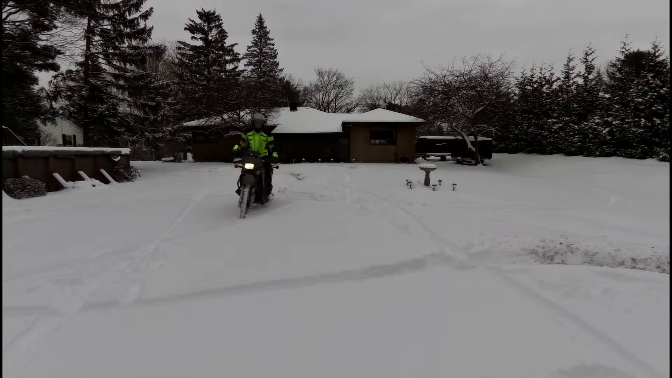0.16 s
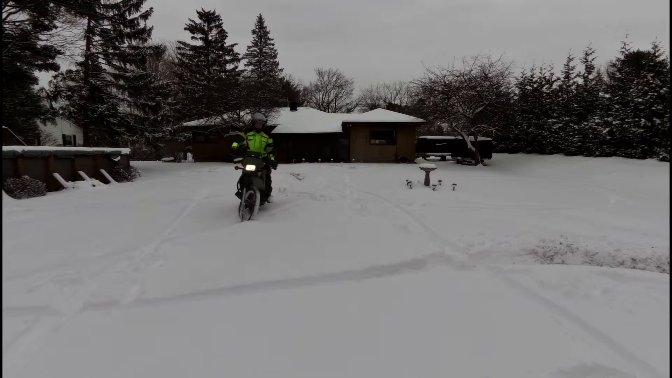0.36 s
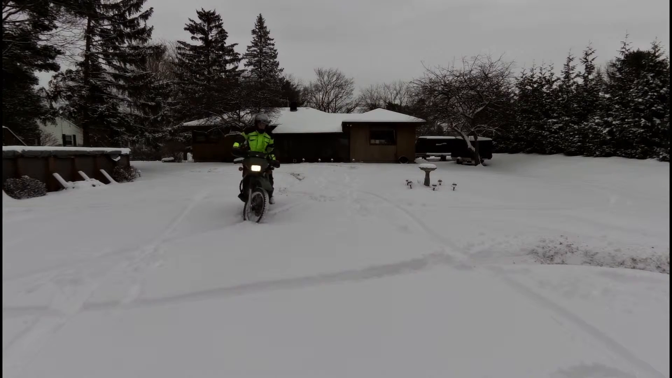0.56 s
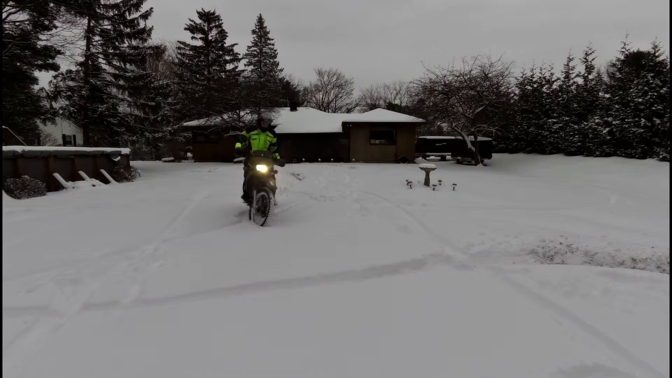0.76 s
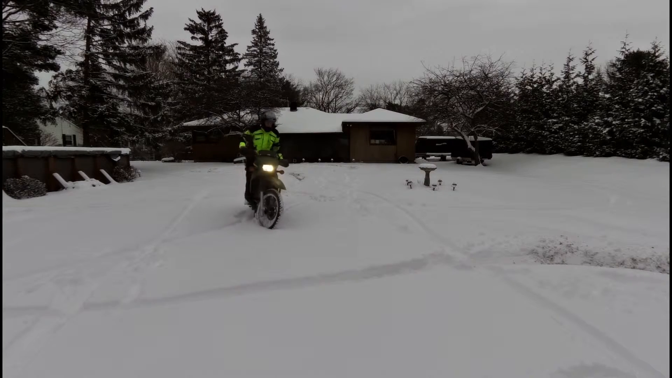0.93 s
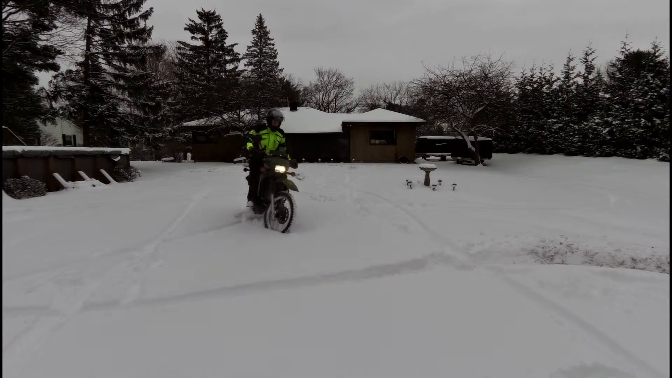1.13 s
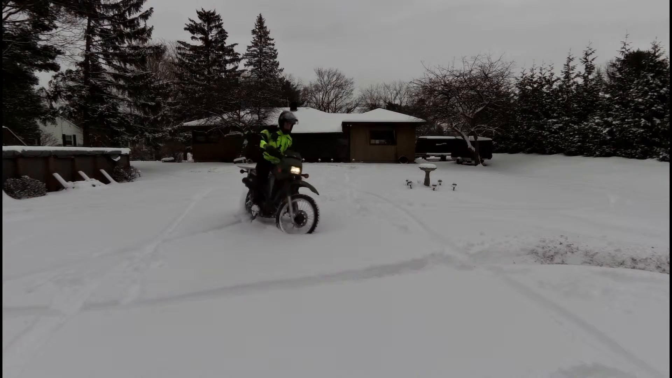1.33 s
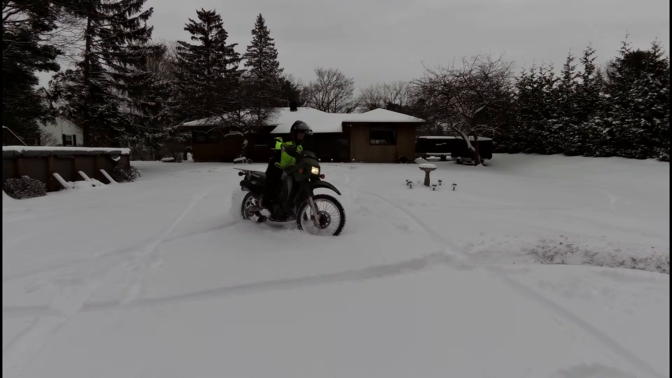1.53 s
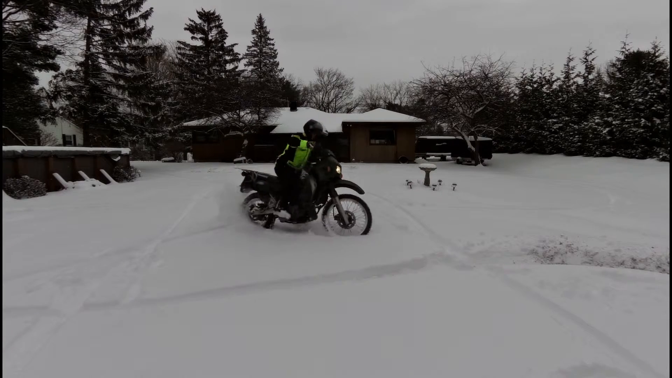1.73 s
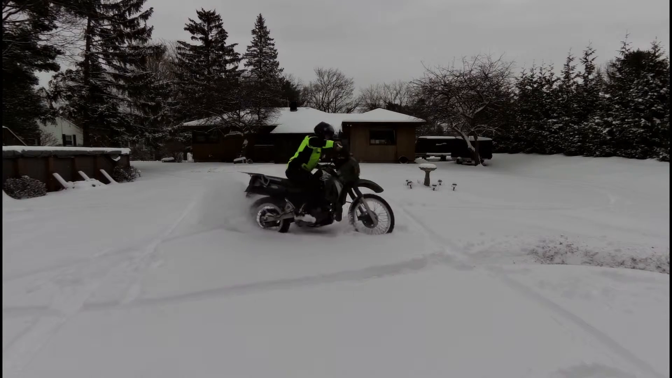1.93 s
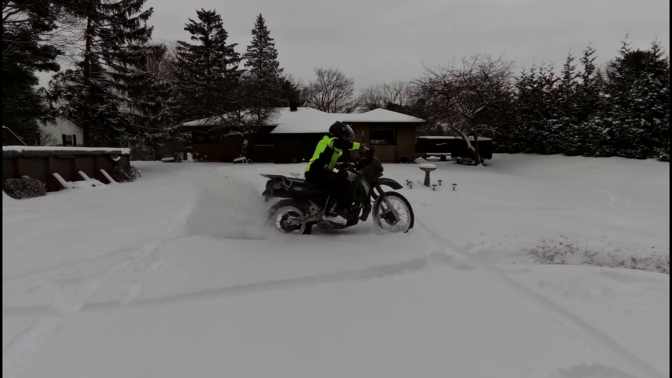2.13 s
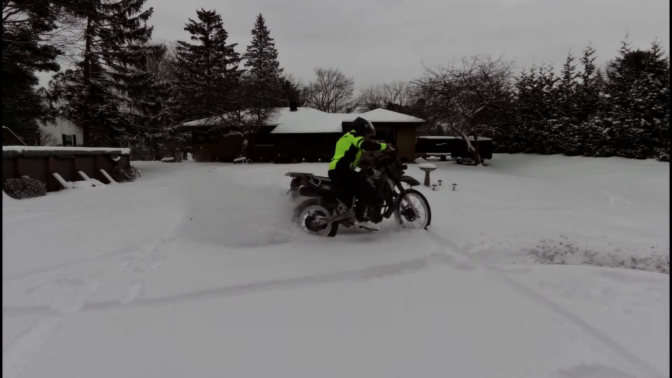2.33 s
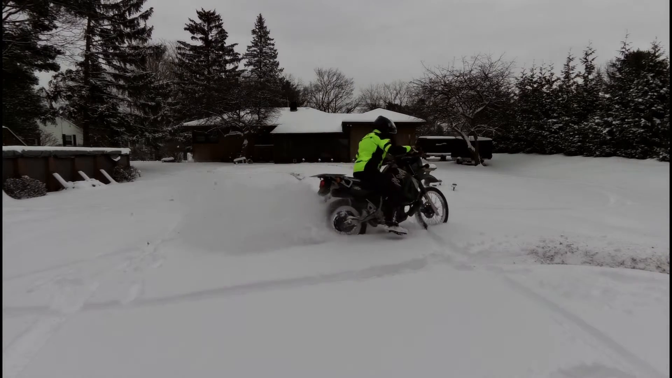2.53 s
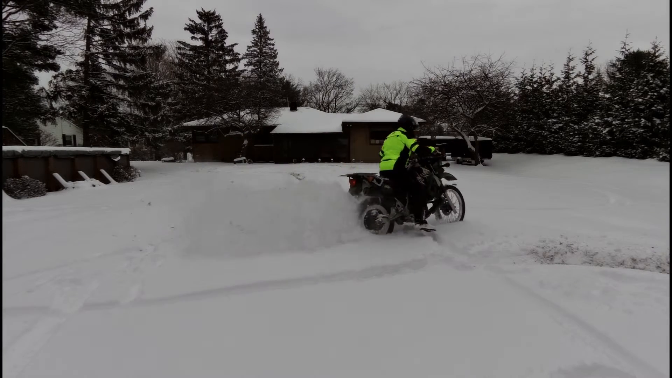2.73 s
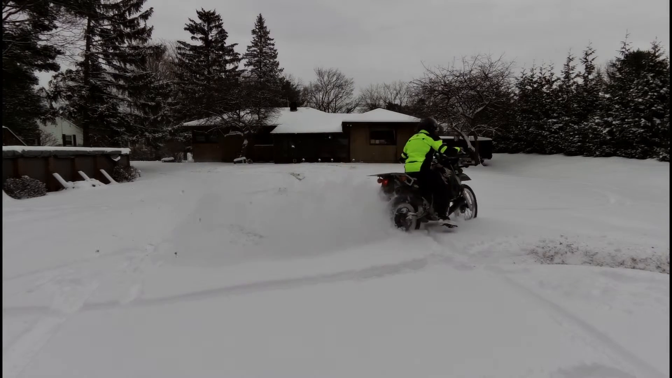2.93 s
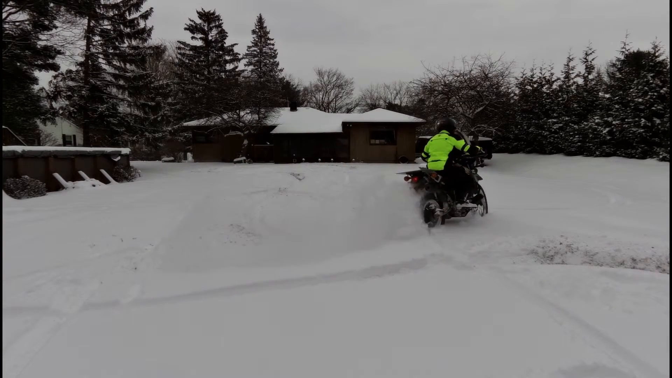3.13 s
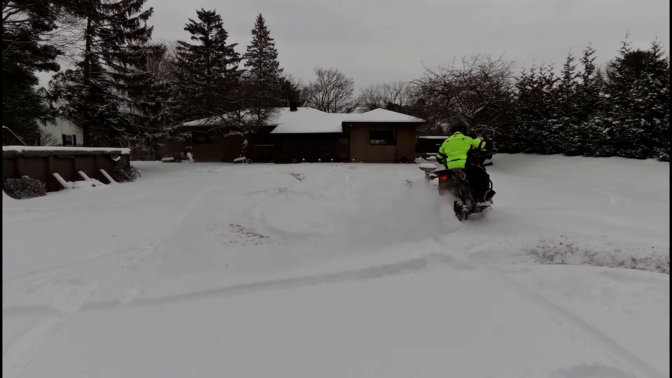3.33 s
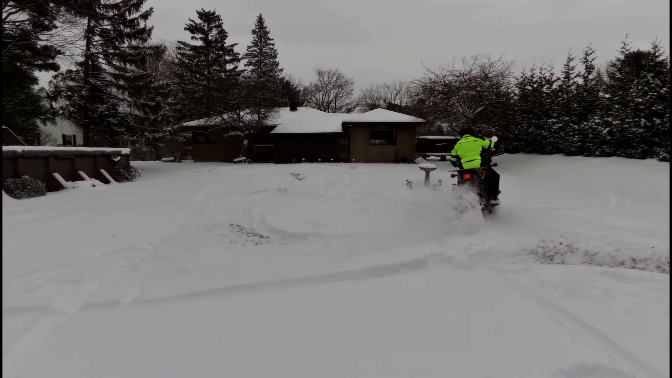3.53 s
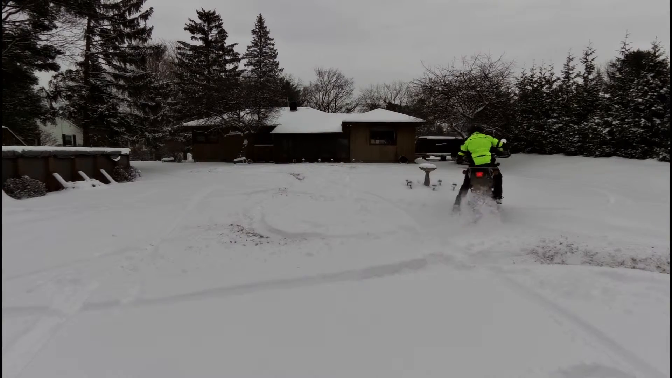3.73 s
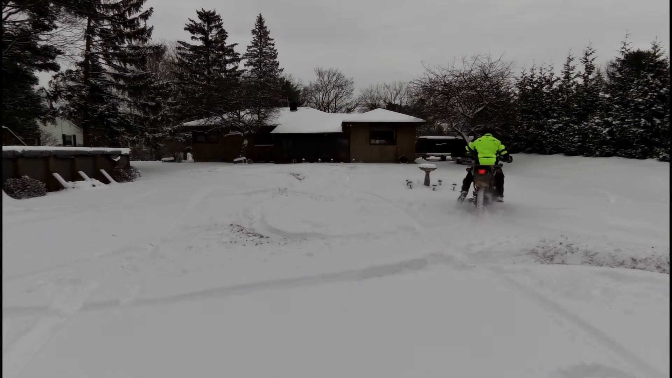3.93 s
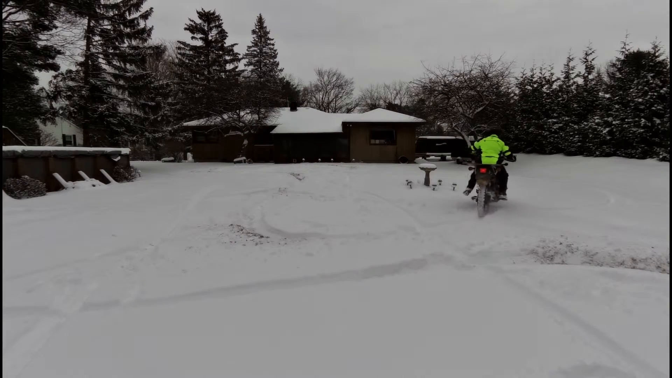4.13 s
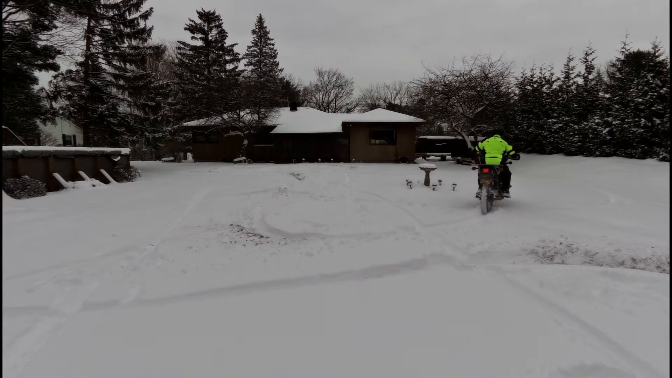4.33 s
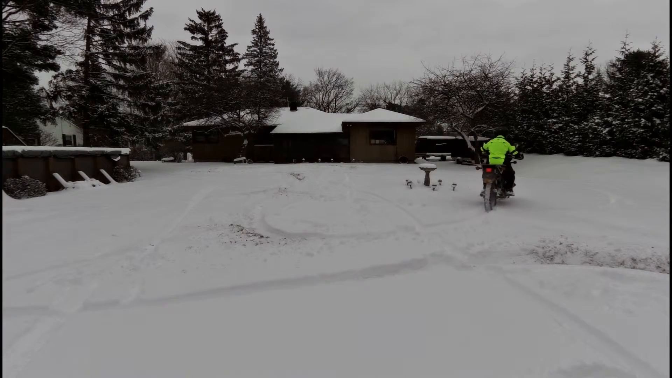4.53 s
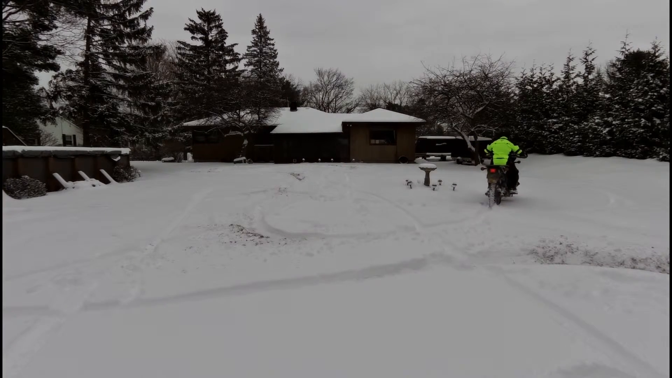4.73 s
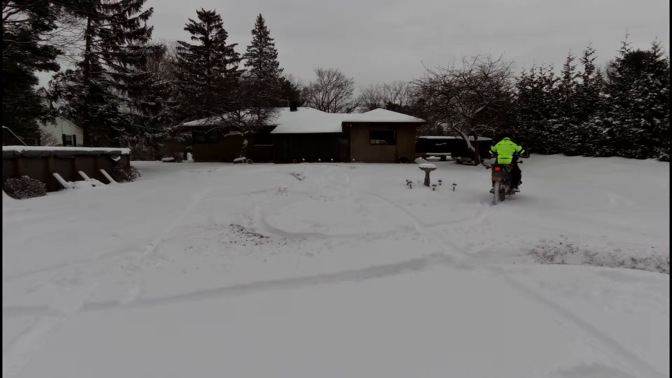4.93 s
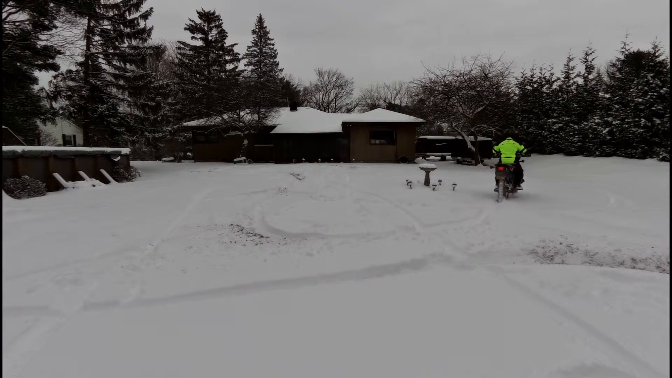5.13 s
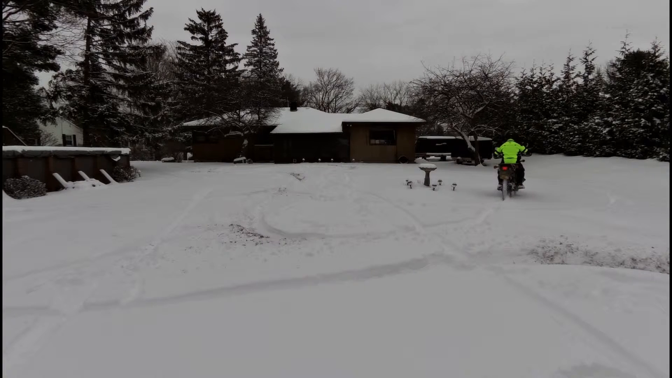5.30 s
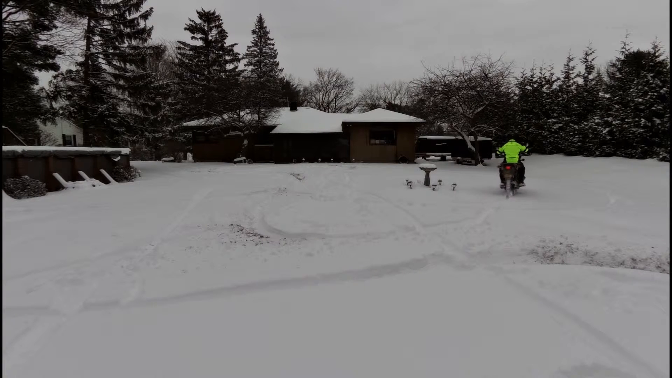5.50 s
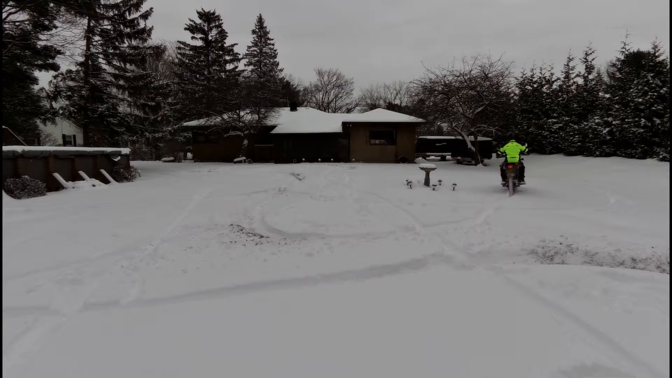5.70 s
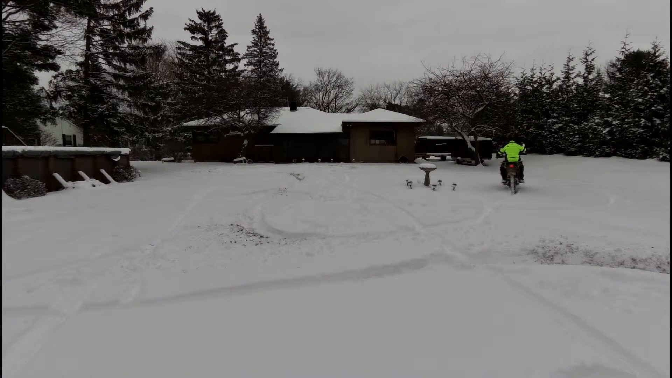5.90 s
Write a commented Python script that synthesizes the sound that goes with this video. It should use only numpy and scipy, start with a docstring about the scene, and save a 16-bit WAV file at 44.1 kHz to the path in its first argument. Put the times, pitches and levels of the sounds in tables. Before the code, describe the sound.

A one-cylinder motorcycle putters closer over snow, opens up into a barking roar, coughs shut, revs once more and idles away.

```python
"""Motorcycle in deep snow

A one-cylinder, four-stroke motorcycle idles, comes closer and pulls past on an open throttle,
shuts off with a few misfires, revs once more and idles away, with snow spray hissing along.
In every cycle the engine gulps air, knocks, cracks out of the tailpipe and sets the exhaust booming:
these are pulses, ringing tones and noise bursts timed by one list of firings.
House and trees answer as fading noise echoes, over still winter air."""
import sys
import numpy as np
from scipy import signal
from scipy.fft import rfft, irfft, next_fast_len
from scipy.io import wavfile

SR = 44100
rng = np.random.default_rng(int(sys.argv[2]) if len(sys.argv) > 2 else 0)


def pcm_store(signal):
    """Save signal as 16-bit PCM."""
    levels = np.round(np.clip(np.atleast_2d(signal), -1, 1) * 32767)
    wavfile.write(sys.argv[1], SR, levels.astype(np.int16).T)


N = 267246
T = np.arange(N) / SR  # time of every sample, s


def amp(db):
    """Turn decibels into a plain gain."""
    return 10 ** (np.asarray(db) / 20)


def unit(x):
    """Scale a signal to rms 1."""
    return x / np.sqrt(np.mean(x ** 2) + 1e-20)


def along(points, hz):
    """Read a (frequency, value) curve on a logarithmic frequency axis."""
    f, v = np.transpose(points)
    return np.interp(np.log(hz + 1), np.log(f), v)


def curves(rows, at):
    """Read each column after the time column at the given times."""
    s, *cols = np.transpose(rows)
    return [np.interp(at, s, c) for c in cols]


def filtered(x, response):
    """Multiply the spectrum of x by a response given as a function of frequency."""
    m = next_fast_len(N + SR // 2)
    return irfft(rfft(x, m) * response(np.fft.rfftfreq(m, 1 / SR)), m)[:N]


def noise(spectrum):
    """Make coloured noise of rms 1."""
    return unit(filtered(rng.standard_normal(N), lambda hz: amp(along(spectrum, hz))))


def causal(spectrum, size=4096):
    """Make an impulse response with the given colour and energy 1 that never sounds ahead of its cause."""
    log_level = np.log(amp(along(spectrum, np.fft.rfftfreq(size, 1 / SR))) + 1e-6)
    cepstrum = irfft(log_level)
    # folding the cepstrum onto positive times gives minimum phase
    cepstrum[1:size // 2] *= 2
    cepstrum[size // 2 + 1:] = 0
    h = irfft(np.exp(rfft(cepstrum)))
    return h / np.linalg.norm(h)


def scatter(count, scatter_db):
    """Random gains that make repeated events a little louder or softer."""
    return amp(scatter_db * rng.standard_normal(count))


def train(times, sizes):
    """Place single-sample impulses at the given times."""
    inside = (times >= 0) & (times < T[-1])
    return np.bincount((times[inside] * SR).astype(int), sizes[inside], N)


def bursts(times, sizes, decay, scatter_db):
    """Power envelope of bursts that start at the given times and die away."""
    power = (sizes * scatter(len(times), scatter_db)) ** 2
    keep = np.exp(-1 / (decay * SR))
    dying = signal.lfilter([1 - keep], [1, -keep], train(times, power * SR))
    rise = signal.windows.hann(SR // 700) ** 2  # a burst takes about a millisecond to build
    return np.convolve(dying, rise / rise.sum(), "same")


# engine speed: (time [s], firings per second [Hz])
ENGINE_SPEED = [(0.0, 10.79), (0.465, 10.42), (0.761, 17.8), (0.886, 18.33), (1.117, 15.32), (1.335, 15.3),
                (1.556, 20.5), (2.017, 26.92), (2.301, 26.22), (2.935, 28.21), (3.246, 27.6),
                (3.393, 21.05), (3.5, 20.36), (4.038, 29.73), (4.273, 30.61), (4.862, 17.7), (5.158, 13.63),
                (5.718, 10.21), (6.06, 10.47)]
START_CYCLE = 0.645  # share of a cycle already over at the start


def crank_cycles():
    """Adding up the engine speed gives the cycles turned so far."""
    return START_CYCLE + np.cumsum(curves(ENGINE_SPEED, T)[0]) / SR


def firings():
    """Times [s] at which the exhaust valve opens, once per cycle, and the cycle length [s] at each."""
    cycles = crank_cycles()
    times = np.interp(np.arange(1, int(cycles[-1]) + 1), cycles, T)
    return times, 1 / curves(ENGINE_SPEED, times)[0]


# the one hard twist of the throttle: (opens [s], shuts [s], opening [0-1])
THROTTLE_TWIST = (1.24, 3.215, 0.73)
ROLL_ON_S, SHUT_S = 0.9, 0.014  # the rider rolls it on slowly and lets it snap shut
# loop through the yard: (time [s], distance [m], tailpipe turned toward the microphone [0-1])
YARD_LOOP = [(0, 10.5, 0.23), (1, 7.5, 0), (1.5, 6.6, 0.01), (2, 5.05, 0.29), (3, 5.5, 0.69),
             (3.5, 8.97, 0.99), (4.1, 7.75, 0.44), (5, 10.24, 0.72), (6.06, 12.3, 0.73)]


def ride(at):
    """Throttle opening, and how far the tailpipe faces the microphone, at the given times."""
    opens, shuts, opening = THROTTLE_TWIST
    rolled_on = 1 - np.exp(-np.maximum(at - opens, 0) / ROLL_ON_S)
    let_go = np.exp(-np.maximum(at - shuts, 0) / SHUT_S)
    return np.clip([opening * rolled_on * let_go, curves(YARD_LOOP, at)[1]], 0, 1)


CRUISE_HZ = 20  # firing rate at which a loudness law has no speed change


def loudness(law, at):
    """Gain of a layer: its law adds decibels for throttle, heading and engine speed to a base level."""
    base_db, throttle_db, facing_db, speed_db = law
    throttle, facing = ride(at)
    doublings = np.log2(curves(ENGINE_SPEED, at)[0] / CRUISE_HZ)
    return amp(base_db + throttle_db * throttle + facing_db * facing + speed_db * doublings)


def swell(times, period, hz, crest, sharpness, scatter_db):
    """One swelling and dying oscillation per firing, of mean power 1 before the random scatter."""
    t = np.arange(SR // 12) / SR
    u = t / crest[:, None]
    envelope = (u * np.exp(1 - u)) ** sharpness[:, None]
    wave = envelope * np.cos(2 * np.pi * hz[:, None] * (t - crest[:, None]))
    size = np.sqrt(period * SR) / np.linalg.norm(wave, axis=1) * scatter(len(times), scatter_db)
    return train((times[:, None] + t).ravel(), (wave * size[:, None]).ravel())


# neighbouring firings sound alike for about this long, and mostly below this frequency
PATTERN_S, TURBULENT_HZ = 0.18, 1900


def repeating(spectrum, times, size=16384):
    """Noise of rms 1 whose pattern returns with each firing and drifts slowly; its treble is always new."""
    patterns = rng.standard_normal((len(times), size))
    for k, keep in enumerate(np.exp(-np.diff(times) / PATTERN_S)):
        patterns[k + 1] = keep * patterns[k] + np.sqrt(1 - keep ** 2) * patterns[k + 1]
    nearest = np.rint(np.interp(T, times, np.arange(len(times)))).astype(int)
    alike = patterns[nearest, (np.arange(N) - (times * SR).astype(int)[nearest]) % size]

    def colour(hz):
        return amp(along(spectrum, hz)) / np.hypot(1, hz / TURBULENT_HZ)

    fresh = filtered(rng.standard_normal(N), lambda hz: colour(hz) * hz / TURBULENT_HZ)
    return unit(filtered(alike, colour) + fresh)


def puff(times, period, place, scatter_db):
    """Envelope of a rush of gas, peak about 1, that swells and fades at the same place in every cycle."""
    share, width = place
    nearest = np.rint(np.interp(T, times + share * period, np.arange(len(times)))).astype(int)
    u = ((T - times[nearest]) / period[nearest] - share) / width
    return scatter(len(times), scatter_db)[nearest] * np.exp(-(u / 2) ** 2)


# colour of the still air: (frequency [Hz], relative level [dB])
AIR_COLOUR = [(20, -31.5), (60, 8), (200, -5), (1000, -4), (3000, -31), (6000, -22), (12000, -37)]


def still_air():
    """Still winter air is a faint, steady noise."""
    return amp(-52.5) * noise(AIR_COLOUR)


# colour of flying snow: (frequency [Hz], relative level [dB])
SPRAY_COLOUR = [(800, -25), (2500, -5.5), (4500, -2), (5400, 5), (8500, -11.5), (12000, -27)]
# spray against the roar: (base [dB], at full throttle [+dB], tail-on [+dB], per doubling of speed [+dB])
SPRAY_LAW = (-33, 0.5, -2, -0.5)


def snow_spray(roar):
    """Powder thrown by the rear wheel hisses as bright noise that follows the level of the roar."""
    return roar * loudness(SPRAY_LAW, T) * noise(SPRAY_COLOUR)


# drone and intake hum: (base [dB], at full throttle [+dB], tail-on [+dB], per doubling of speed [+dB])
DRONE_LAW = (-64.5, 0.5, 2.5, 32)
INTAKE_LAW = (-49.5, -2, -18, 7.5)


def hum():
    """Suction tones follow the crank: a drone once per turn, and an intake hum an octave up, from the front."""
    crank = 2 * np.pi * 2 * crank_cycles()  # two turns per firing
    drone = loudness(DRONE_LAW, T) * np.cos(crank)
    intake = loudness(INTAKE_LAW, T) * np.cos(2 * crank)
    return -np.sqrt(2) * (drone + intake)


# metal contacts in a cycle: (share of the cycle after the exhaust opens [1], power decay [s], level [dB])
METAL_CONTACTS = [(-.25, .005, -0.5), (-.12, 0.0086, .5), (.14, .006, -3)]
# colour of the engine cases: (frequency [Hz], relative level [dB])
CASE_COLOUR = [(120, -37), (210, -11.5), (320, -3.5), (430, -3), (600, -3.5), (900, -3.5), (1200, -9),
               (1500, -11.5), (2100, -18), (2700, -20), (4000, -31.5), (5200, -61.5), (11000, -100)]
# against the roar: (base [dB], at full throttle [+dB], tail-on [+dB], per doubling of speed [+dB])
KNOCK_LAW = (-4.5, 1.5, -13, 1)
WHIRR_LAW = (-4.5, -4.5, -0.5, -4)


def clatter(times, period):
    """Combustion and valve gear knock on the cases, loudest from the front, over a whirr of gears and chain."""
    size = np.sqrt(period) * loudness(KNOCK_LAW, times)
    times = times + .001 * rng.standard_normal(len(times))  # loose parts strike a little early or late
    knocks = sum(bursts(times + share * period, size * amp(db), decay, scatter_db=0.4)
                 for share, decay, db in METAL_CONTACTS)
    return np.sqrt(knocks + loudness(WHIRR_LAW, T) ** 2) * repeating(CASE_COLOUR, times)


# how long the yard's echo takes to fall by 60 dB: (frequency [Hz], time [s])
YARD_FADE = [(100, 1), (700, 0.8), (3000, 0.89), (9000, 0.29)]


def yard(x, count=14):
    """House and trees scatter sound as fading noise; the pattern changes as the motorcycle moves."""
    out = np.zeros(N)
    for k in range(count):
        hz, t, z = signal.stft(rng.standard_normal(SR // 2), SR, nperseg=256)
        fading = z * amp(-60 * t / along(YARD_FADE, hz)[:, None])
        tail = signal.istft(fading, SR, nperseg=256)[1]
        # each pattern takes its turn and blends into the next
        here = np.clip(1 - abs(T / T[-1] * (count - 1) - k), 0, 1)
        out += signal.fftconvolve(x * np.sqrt(here), tail / np.linalg.norm(tail))[:N]
    return out


# small clicks: (time [s], relative level [dB])
CLICKS = [(.0095, -31.5), (1.3078, -40.5)]


def ticks():
    """Each short bright click is noise that starts at once and dies away in a few milliseconds."""
    start, db = np.transpose(CLICKS)
    t = np.maximum(T[:, None] - start, 0)
    shape = (amp(db - 6) * (t > 0) * np.exp(-t / .003)).sum(axis=1)
    return shape * noise([(2000, -23), (3900, 0.0), (5500, -3.5), (11000, -33.0)])


# exhaust tones: (base [dB], at full throttle [+dB], tail-on [+dB], per doubling of speed [+dB])
THROB_LAW = (-61, 1, -4, 0.5)
BOOM_LAW = (-44, -2.5, 10.5, 4.5)
OVERTONE_LAW = (-63.5, 9.5, 13, 19)
OVERTONE_ORDER = 13.5  # overtone pitch as a multiple of the firing rate
PUSH_SHARE = 0.3442  # share of a cycle from the exhaust opening to the piston's push


def boom(times, period):
    """Slugs of gas set the silencer and pipe ringing; hot gas under load raises the boom's pitch."""
    burns = np.abs(times[:, None] - np.array(MISFIRES)[:, 0]).min(axis=1) > period / 2  # misfires do not boom
    times, period = times[burns], period[burns]
    throttle, facing = ride(times)
    even = np.ones(len(times))
    pipe_hz = np.maximum(73 + 12 * throttle + 1.917 / period, 99)
    # the thump is compact at idle and rings through the whole cycle under load
    sharpness = np.clip(4.2 - 3.3 * facing - 4.2 * throttle, .8, 8)
    pipe = swell(times - .002, period, pipe_hz, 0.011 * even, sharpness, scatter_db=0.18)
    overtone_hz = np.maximum(OVERTONE_ORDER / period, 335)  # climbs with the revs

    def ring(at):
        return swell(at - .0047, period, overtone_hz, 0.004783 * even, 2.27 * even, scatter_db=1.5)

    # it sounds as the valve opens and again, inverted, as the piston pushes
    overtone = ring(times) - (0.5 + 1.1 * ride(T)[0]) * ring(times + PUSH_SHARE * period)
    throb = swell(times - .012, period, 60 * even, 0.025 * even, 1.15 * even, scatter_db=1.0)
    return (loudness(BOOM_LAW, T) * pipe + loudness(THROB_LAW, T) * throb
            + loudness(OVERTONE_LAW, T) * overtone)


# ringing of the valve gear: (frequency [Hz], level [dB], time to fall by 60 dB [s])
VALVE_RINGS = [(2780, -1, .025), (3030, 0.5, 0.039), (3450, 0.5, 0.031), (3770, -1, .04),
               (4150, -4.5, 0.036), (5300, -9.5, .02)]
# where the valves tap: (first tap [share of a cycle], second tap [share of a cycle])
TAP_PLACES = (-0.015, 0.16)
# taps against the roar: (base [dB], at full throttle [+dB], tail-on [+dB], per doubling of speed [+dB])
TAP_LAW = (-39.5, -9.5, 21.5, -10.5)


def tappets(times, period, scatter_db=2.5):
    """Valves tap on their seats and ring a little differently each time; the taps stand out at idle."""
    taps = np.concatenate([times + share * period for share in TAP_PLACES])
    taps = taps + 0.0017 * rng.standard_normal(len(taps))
    t = np.arange(SR // 16) / SR
    out = np.zeros(N)
    for hz, db, t60 in VALVE_RINGS:
        strikes = train(taps, loudness(TAP_LAW, taps) * scatter(len(taps), scatter_db))
        ringing = amp(db - 60 * t / t60) * np.sin(2 * np.pi * hz * t)
        out += signal.fftconvolve(strikes, ringing)[:N]
    return out


# pressure waves leaving the tailpipe after the exhaust valve opens:
# (delay [s], signed strength with the throttle shut [1], signed strength at full throttle [1])
PRESSURE_WAVES = [(-.0006, 1.08, 1.17), (.0028, -.3, -0.043), (.0079, .2, .2), (.0113, -0.62, -0.8)]
# colour of the exhaust front: (frequency [Hz], relative level [dB])
BARK_COLOUR = [(100, -14), (210, -11.5), (290, -6.5), (380, 6.5), (500, 0.5), (640, 9), (800, -7.5),
               (1020, -5.5), (1400, -6), (2200, -22), (2900, -29), (3500, -42), (5200, -66.5), (11000, -80)]
# bark against the roar: (base [dB], at full throttle [+dB], tail-on [+dB], per doubling of speed [+dB])
BARK_LAW = (-8, 8.7, -2, -0.5)
SMEAR_HZ = 1260  # the silencer's chambers spread each front into a short ripple around this frequency


def bark(times, period, jitter=.00003, scatter_db=.7):
    """The escaping gas is a pressure front, then its reflections in the pipe, reshaped by the load."""
    throttle, facing = ride(times)
    size = np.sqrt(period * SR * facing) * loudness(BARK_LAW, times)
    fronts = np.zeros(N)
    for delay, shut, full in PRESSURE_WAVES:
        arrival = times + delay + jitter * rng.standard_normal(len(times))
        strength = shut + (full - shut) * throttle
        fronts += train(arrival, strength * size * scatter(len(times), scatter_db))

    def smear(hz):  # shifts the phase and leaves the level alone
        return np.exp(-2j * np.arctan2(hz * SMEAR_HZ, SMEAR_HZ ** 2 - hz ** 2))

    return signal.fftconvolve(filtered(fronts, smear), causal(BARK_COLOUR))[:N]


# gas rushing out: (delay [s], power decay [s], relative level [dB])
GAS_JETS = [(0, 0.006, 0), (.0075, 0.013, -5.5)]
# colours of the gas jet and of the outlet rasp: (frequency [Hz], relative level [dB])
GAS_COLOUR = [(120, -46), (230, -30), (380, -3), (520, 0.5), (750, 1.5), (1050, -3), (1500, -13.5),
              (2100, -17.5), (2900, -28), (4000, -36), (5200, -63.5), (11000, -100)]
RASP_COLOUR = [(1200, -6.5), (2200, -8), (2900, 7), (3400, -5), (4100, -9), (4600, -29), (5400, -15),
               (7000, -25), (11000, -66)]


def gas(times, period):
    """Turbulent puffs follow the fronts; under load the jet's edge rasps at the outlet."""
    throttle, facing = ride(times)
    size = np.sqrt(period * facing)
    late = 0.00074 * (1 - throttle) * rng.standard_normal(len(times))  # weak firings burn unevenly
    puffs = sum(bursts(times + delay + late, size * amp(db - 3.6 * throttle), decay, scatter_db=0.5)
                for delay, decay, db in GAS_JETS)
    edge = sum(bursts(times + delay, size * throttle * facing, 0.0032, scatter_db=1.5)
               for delay in (-.001, .0065))
    jet = amp(-3.5) * np.sqrt(puffs) * repeating(GAS_COLOUR, times)
    rasp = amp(-9.0) * np.sqrt(edge) * repeating(RASP_COLOUR, times)
    return jet + rasp


# colours of the piston's chuff and the outlet's whistle: (frequency [Hz], relative level [dB])
CHUFF_COLOUR = [(400, -24.5), (1000, -4), (1500, 2), (2200, -3.5), (2900, -5), (3400, -16.5), (4100, -14.5),
                (4600, -22), (5400, -18), (7000, -30.5), (11000, -56)]
WHISTLE_COLOUR = [(3000, -19.5), (4600, -19.5), (5250, 0.5), (5700, 0.5), (6500, -13.5), (8500, -14),
                  (12000, -33.5)]
# chuff against the roar: (base [dB], at full throttle [+dB], tail-on [+dB], per doubling of speed [+dB])
CHUFF_LAW = (-15.5, -3, 11, -0.5)
# place of each rush of gas, counted from the exhaust opening: (share of the cycle, width as a share)
CHUFF_AT, WHISTLE_AT = (.22, 0.04), (.1, .12)
WHISTLE_DB = -27  # at full throttle, relative to the roar


def chuff(times, period):
    """The rising piston drives the rest of the gas out in one bright puff; under load the outlet whistles."""
    rush = loudness(CHUFF_LAW, T) * puff(times, period, CHUFF_AT, scatter_db=1.5)
    whistle = amp(WHISTLE_DB) * np.sqrt(ride(T)[0]) * puff(times, period, WHISTLE_AT, scatter_db=0.5)
    return rush * repeating(CHUFF_COLOUR, times) + whistle * noise(WHISTLE_COLOUR)


# colour of the intake's gulp: (frequency [Hz], relative level [dB])
GULP_COLOUR = [(200, -19.5), (350, -0.5), (600, 10), (900, 6), (1400, -6), (2000, -0.5), (2700, -17.5),
               (3500, -34), (6000, -38), (11000, -61)]
# level of the gulp, which the rider hides as the motorcycle turns away: (time [s], level [dB])
GULP_FADER = [(.42, -59), (.48, -44.5), (1.0, -43), (1.5, -37.5), (1.85, -36.5), (2.25, -39.5), (2.9, -59),
              (4.5, -71.5)]
# places in the cycle of the gulp and of the hiss: (share of the cycle [1], width as a share [1])
GULP_PLACE = (-.21, .035)
SUCK_PLACE = (-0.13, 0.096)
SUCK_DB = -5  # hiss at full throttle, relative to the gulp


def gulp(times, period):
    """Off idle, each cycle snatches air with a short bright gulp; an open throttle draws it into a hiss."""
    snatch = puff(times, period, GULP_PLACE, scatter_db=.5) * repeating(GULP_COLOUR, times)
    hiss = amp(SUCK_DB) * np.sqrt(ride(T)[0]) * puff(times, period, SUCK_PLACE, scatter_db=2.4)
    return amp(curves(GULP_FADER, T)[0]) * (snatch + hiss * repeating(CHUFF_COLOUR, times))


# ringing tones of the silencer's steel shell: (frequency [Hz], level [dB])
SHELL_RINGS = [(945, -3), (1055, -4), (1400, -8.5)]
SHELL_DB, SHELL_DELAY_S, SHELL_CREST_S = -5.5, 0.00439, 0.0031  # level at full throttle, relative to the roar
BROADSIDE, BEAM_WIDTH = 0.35, 0.22  # heading at which the shell faces the microphone, and the spread around it


def shell(times, period):
    """Under load each firing rings the silencer's shell near 1 and 1.4 kHz, and it radiates sideways."""
    throttle, facing = ride(T)
    even = np.ones(len(times))
    ring = sum(amp(db) * swell(times + SHELL_DELAY_S, period, hz * even, SHELL_CREST_S * even, even,
                               scatter_db=1.0) for hz, db in SHELL_RINGS)
    sideways = np.exp(-((facing - BROADSIDE) / BEAM_WIDTH) ** 2 / 2)
    return amp(SHELL_DB) * throttle * sideways * ring


# misfires as the throttle snaps shut: (time [s], peak level [dB], pitch [Hz])
MISFIRES = [(3.306, -29, 81), (3.349, -25.5, 90.3), (3.397, -25.5, 96.5)]
COUGH_S = 0.0092  # half the length of a misfire


def pops():
    """A misfire gives a short, deeper cough in the silencer in place of the boom."""
    s, db, hz = np.transpose(MISFIRES)
    t = T[:, None] - s
    return -(amp(db) * np.exp(-(t / COUGH_S) ** 2) * np.cos(2 * np.pi * hz * t)).sum(axis=1)


# roar, and its treble against it: (base [dB], at full throttle [+dB], tail-on [+dB], per doubling [+dB])
ROAR_LAW = (-40, 3.5, 3, 8.5)
TREBLE_LAW = (-9.5, -0.5, 4.5, 0.5)
NEAR_M = 7  # distance at which nearness is 1


def scene():
    """Most of the engine and the snow spray fade with distance; the yard echoes the engine over still air."""
    times, period = firings()
    nearness = NEAR_M / curves(YARD_LOOP, T)[0]
    roar = nearness * loudness(ROAR_LAW, T)
    engine = roar * (bark(times, period) + gas(times, period) + clatter(times, period) + shell(times, period))
    # the treble beams from the outlet and changes as the motorcycle turns
    treble = filtered(engine, lambda hz: 1 / (1 + (1900 / (hz + 1)) ** 6))
    engine = engine + (loudness(TREBLE_LAW, T) - 1) * treble
    engine = engine + roar * (chuff(times, period) + tappets(times, period))
    engine = engine + gulp(times, period)
    low = nearness * (boom(times, period) + hum()) + pops()
    echo = yard(amp(-13.5) * engine + amp(-24) * low)
    return (engine + low + echo + snow_spray(roar) + ticks() + still_air())[None]


# treble colour of the microphone: (frequency [Hz], level [dB])
MICROPHONE_COLOUR = [(3000, -0.5), (3600, -2.5), (4150, -3.5), (4550, -7.5), (4900, -9.5), (5300, -12),
                     (6200, -17)]
TOP_HZ = 12400  # band limit


def record(dry):
    """The microphone colours the treble, sheds the deepest bass and keeps nothing above its band limit."""
    def response(hz):
        bass_cut = hz ** 4 / (hz ** 4 + 33 ** 4)
        return amp(along(MICROPHONE_COLOUR, hz)) * bass_cut * (hz < TOP_HZ)

    return filtered(dry[0], response)[None]


dry = scene()
out = record(dry)
pcm_store(out)
```